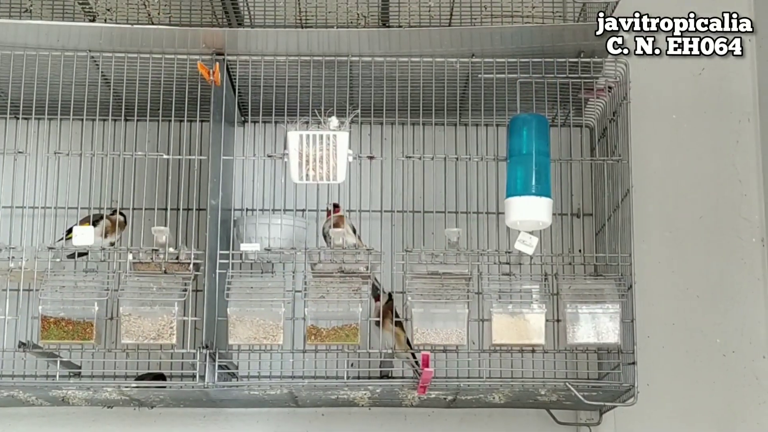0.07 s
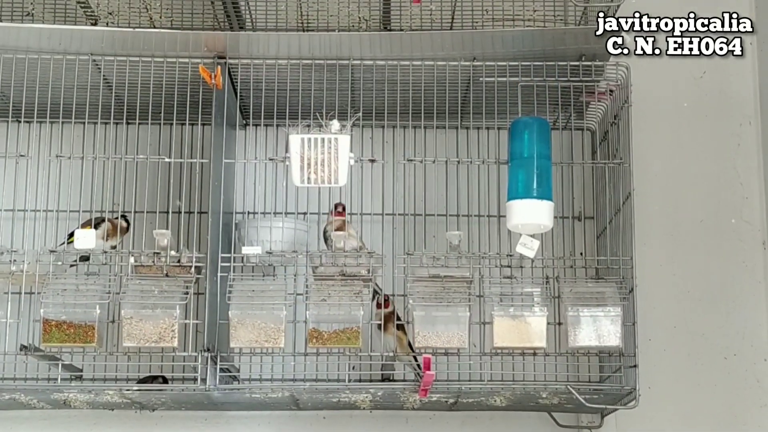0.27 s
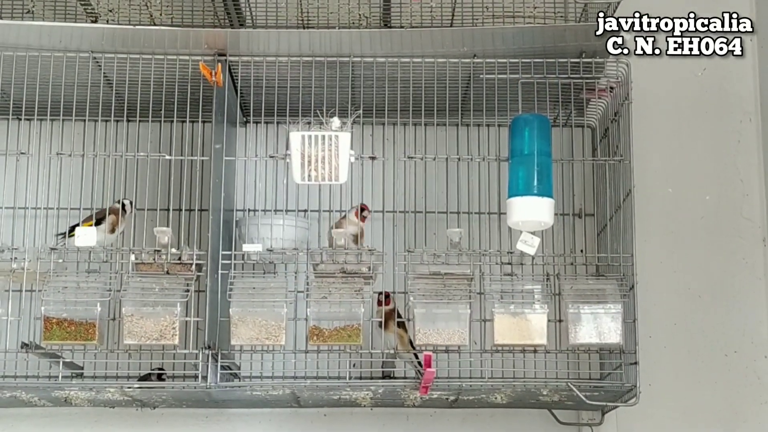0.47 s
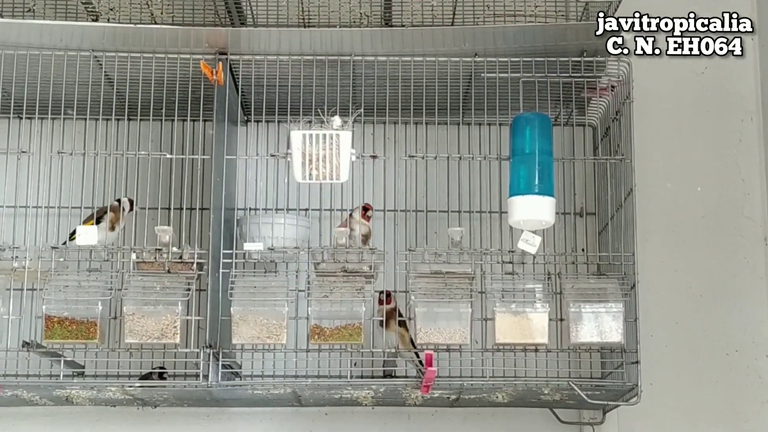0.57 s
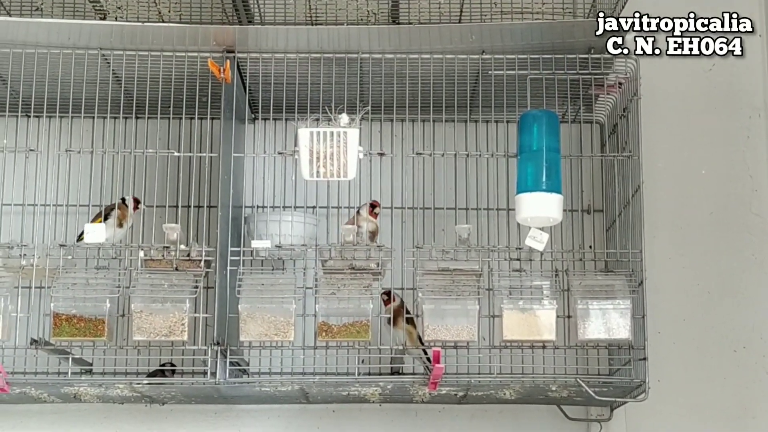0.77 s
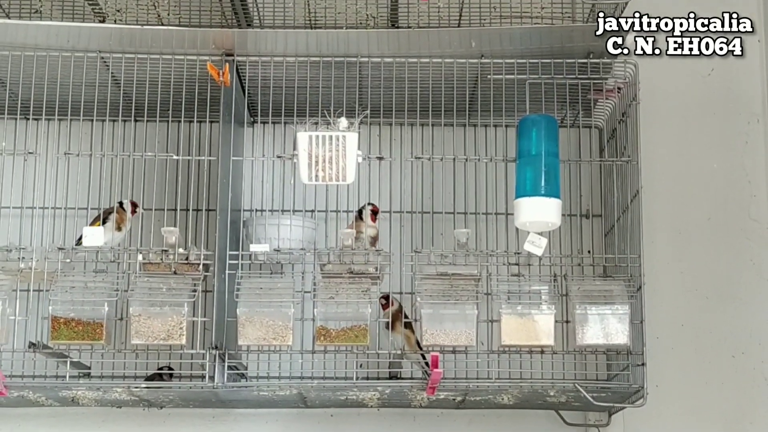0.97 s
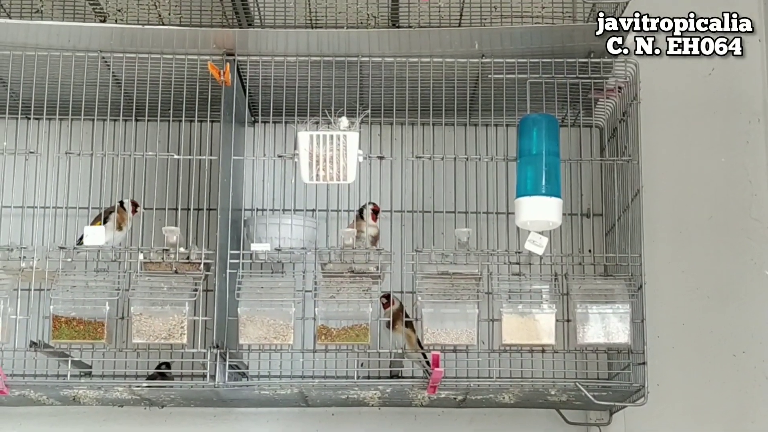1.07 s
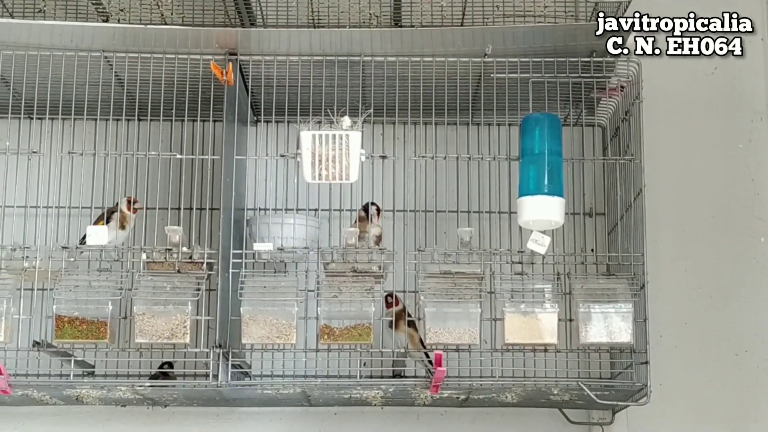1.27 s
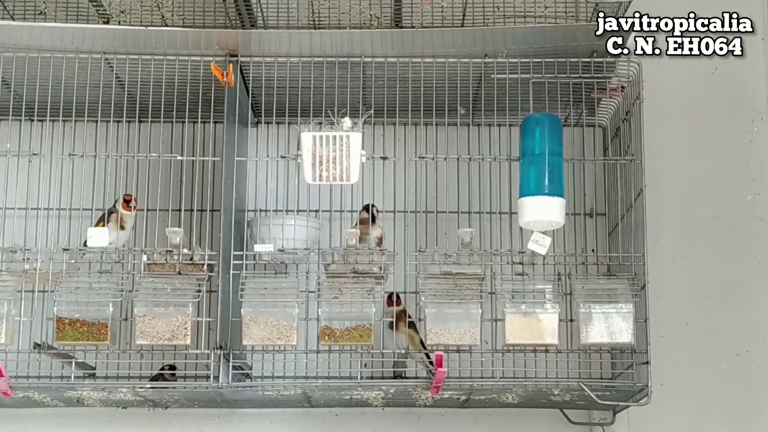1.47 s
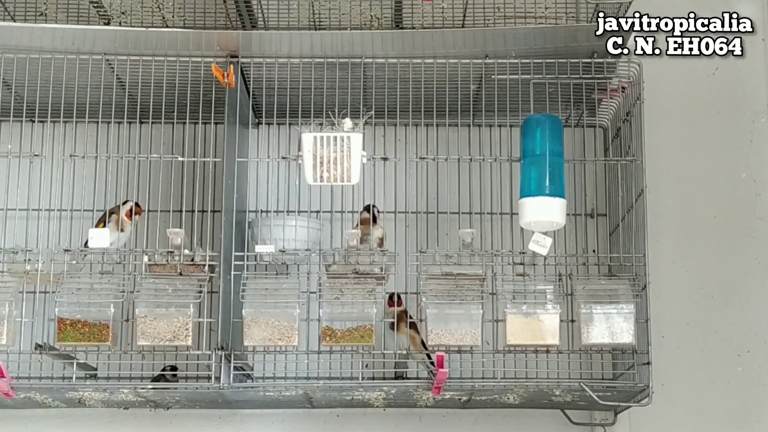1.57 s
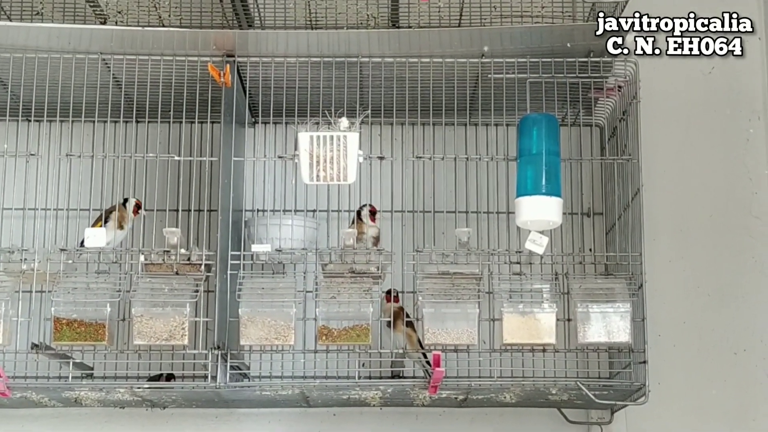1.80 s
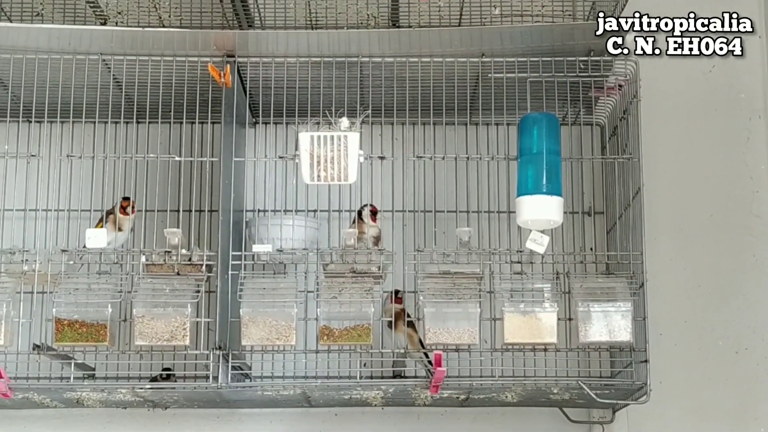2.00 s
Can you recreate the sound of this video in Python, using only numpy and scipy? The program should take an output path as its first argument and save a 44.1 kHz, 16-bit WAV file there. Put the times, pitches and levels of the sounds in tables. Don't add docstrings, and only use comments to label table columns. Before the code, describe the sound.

Caged finches twitter indoors: two sharp two-toned chips at 0.2 and 0.35 s, a whistle sweeping up about an octave from 0.47 to 0.63, then a flap. Claws tick on wire around 0.8-0.96. The loudest cluster of whistles and upward flicks runs 0.93-1.27. Ticks near 1.5, wing flurry at 1.6-1.75 with distant short chirps, fading to a faint peep at 2.0, over soft fan hum, hiss and low rumble.

```python
import sys
import numpy as np
from scipy import signal
from scipy.fft import rfft, irfft
from scipy.io import wavfile
from scipy.ndimage import uniform_filter1d

SR = 44100
rng = np.random.default_rng(int(sys.argv[2]) if len(sys.argv) > 2 else 0)


def how_loud(loudness_db):
    steps = np.asarray(loudness_db, float) / 20
    return 10 ** steps


def unload_audio(sound):
    columns = np.transpose(np.atleast_2d(sound))
    steps = np.round(np.clip(columns, -1, 1) * 32767)
    wavfile.write(sys.argv[1], SR, steps.astype(np.int16))


N = 89964
BIN_HZ = np.fft.rfftfreq(N, 1 / SR)
TIME_S = np.arange(N) / SR


def unit_rms(x):
    return x / np.sqrt(np.mean(x ** 2) + 1e-20)


def read(points, hz):
    point_hz, value = np.transpose(points)
    return np.interp(np.log(hz + 1), np.log(point_hz + 1), value)


def add(mix, start_s, sound):
    part = mix[round(start_s * SR):][:len(sound)]
    part += sound[:len(part)]


def drift(rate_hz):
    spectrum = rfft(rng.standard_normal(N))
    return unit_rms(irfft(spectrum * np.exp(-(BIN_HZ / rate_hz) ** 2), N))


def resonant_noise(center_hz, width_hz):
    spectrum = rfft(rng.standard_normal(N))
    return unit_rms(irfft(spectrum / (1 + (2 * (BIN_HZ - center_hz) / width_hz) ** 2), N))


# freq_hz, t60_s
ROOM_T60 = [(2000, 0.38), (4000, 0.38), (7000, 0.31), (12000, 0.2)]


def in_room(x, pan_db, room_db, lag_samples):
    taps = np.zeros((2, 30000))
    at = np.arange(0, 29980, 12) + rng.integers(0, 12, (2, 2499))
    np.put_along_axis(taps, at, rng.choice([-1., 1.], at.shape), 1)
    hz, t, z = signal.stft(taps, SR, nperseg=128)
    decay = how_loud(-60 * t / read(ROOM_T60, hz)[:, None])
    tail = signal.istft(z * decay, SR, nperseg=128)[1]
    first_echo_s = 0.00074
    tail *= np.clip(np.arange(tail.shape[1]) / SR / first_echo_s - .5, 0, 1)
    wet = signal.fftconvolve(x[None], tail / np.linalg.norm(tail[0]), axes=1)[:, :N]
    direct = np.array([x, np.roll(x, round(lag_samples))])
    return (direct + how_loud(room_db) * wet) * how_loud([[pan_db / 2], [-pan_db / 2]])


# freq_hz, level_db_per_hz
AIR_SPECTRUM = [(30, -4.5), (230, -2), (400, -6), (750, -5), (1200, -9.5), (2300, -9), (5000, -22),
                (14500, -22.5)]
# center_hz, width_hz, boost_db
CAPSULE = (8700, 1780, 10.6)
# freq_hz, correlation
LIKENESS = [(60, 0.95), (180, 1), (540, 0.66), (1630, -0.19), (4880, 0.17), (14700, -0.26)]


def air():
    frames, hz = N // 256 + 5, np.fft.rfftfreq(1024, 1 / SR)
    a, b, c, d, patches = rng.standard_normal((frames, 513, 5)).T
    patches = uniform_filter1d(patches, 30, 0)
    patches = unit_rms(uniform_filter1d(patches, 14, 1))
    same = np.clip(read(LIKENESS, hz), -1, 1)[:, None]
    left = a + 1j * b
    right = same * left + np.sqrt(1 - same ** 2) * (c + 1j * d)
    center_hz, width_hz, boost_db = CAPSULE
    capsule_db = boost_db * np.exp(-((hz - center_hz) / width_hz) ** 2)
    level_db = (read(AIR_SPECTRUM, hz) + capsule_db)[:, None] + 0.8 * patches
    noise = signal.istft(np.array([left, right]) * how_loud(level_db), nperseg=1024, noverlap=768)[1]
    return how_loud(-39.5) * unit_rms(noise[:, :N])


# freq_hz, level_db
HUM = [
    (118.4, -52),
    (220.7, -56),
    (268.5, -53.5),
    (538.3, -55),
    (597.5, -59),
    (629.8, -65),
    (716.0, -59),
]


def fan_hum():
    hum = np.zeros(N)
    for hz, db in HUM:
        level = how_loud(db + 0.5 * drift(5.3))
        cycles = hz * TIME_S + 0.0078 * drift(14) + rng.random()
        hum += level * np.sqrt(2) * np.sin(2 * np.pi * cycles)
    return hum


# time_s, level_db
RUMBLE = [
    (0.0, -38.5),
    (0.229, -38.5),
    (0.61, -45),
    (0.99, -53.5),
    (1.06, -49),
    (2.001, -43.5),
    (2.04, -54),
]


def rumble():
    time_s, level_db = np.transpose(RUMBLE)
    shake = resonant_noise(44.9, 21.4) + how_loud(-18) * resonant_noise(19.0, 22)
    return how_loud(np.interp(TIME_S, time_s, level_db)) * shake


# start_s, length_s, level_db, dullness_db
BEATS = [
    (0.086, 0.063, -47.5, -30),
    (0.63, 0.041, -34.5, -1),
    (1.585, 0.044, -40.5, 7.5),
    (1.649, 0.045, -27.5, -3.5),
    (1.711, 0.044, -45, 11),
    (2.025, 0.037, -40, 15),
]
# freq_hz, level_db_per_hz
FEATHER = [(710, -56), (1200, -23), (2410, -13), (2650, -17.5), (3840, -8), (5500, -9), (8300, 1),
           (11500, -11), (14500, -23)]


def wings():
    snaps_per_s, snap_db = 3000, 3
    hiss = rng.standard_normal(N)
    snap_level = how_loud(snap_db * rng.exponential(1, N))
    snapping = rng.random(N) < snaps_per_s / SR
    snaps = rfft(hiss * (0.88 + snap_level * snapping)) * how_loud(read(FEATHER, BIN_HZ))
    bright = irfft(snaps, N)
    dull = irfft(snaps / (1 + (BIN_HZ / 5800) ** 8), N) / bright.std()
    out = np.zeros(N)
    for start_s, length_s, level_db, dull_db in BEATS:
        stroke = np.sin(np.pi * np.clip((TIME_S - start_s) / length_s, 0, 1) ** 1.17) ** 2
        out += stroke * how_loud(level_db) * (unit_rms(bright) + (how_loud(dull_db) * 2 - 1) * dull)
    return in_room(out, pan_db=-1, room_db=5, lag_samples=5)


# time_s, peak_db, ring_hz
TICKS = [
    (0.8062, -30, 7900),
    (0.884, -24, 8620),
    (0.8913, -42, 8470),
    (0.9618, -25, 8460),
    (0.9804, -46, 8500),
    (1.501, -30.5, 8100),
    (1.571, -23.5, 8880),
]


def claws():
    t60_s, attack_s = 0.0079, 0.00053
    out, t = np.zeros(N), np.arange(600) / SR
    for time_s, peak_db, hz in TICKS:
        ring = np.sin(2 * np.pi * hz * t)
        ring += .5 * np.sin(2 * np.pi * hz * 0.95 * t)
        ring += 0.44 * np.sin(2 * np.pi * hz * .84 * t)
        add(out, time_s, np.minimum(t / attack_s, 1) * how_loud(peak_db - 60 * t / t60_s) * ring / 1.54)
    return in_room(out, pan_db=.6, room_db=6, lag_samples=5)


def breath_haze(breath_db):
    return how_loud(breath_db) * resonant_noise(7950, 8900)


def whistle(hz, level, second_db, third_db, breath):
    phase = 2 * np.pi * np.cumsum(hz) / SR
    tone = np.sin(phase)
    for k, db in ((2, second_db), (3, third_db)):
        tone = tone + how_loud(db) / (1 + (k * hz / 12200) ** 12) * np.sin(k * phase)
    return level * (np.sqrt(2) * tone + breath)


def notes(rows, second_db, third_db, bend, swell_db, tremble, breath_db, pan_db, room_db, lag_samples):
    attack_s, release_s, shimmer_db = .007, .008, 2.5
    out, wobble, shimmer = np.zeros(N), drift(300), drift(200)
    breath = breath_haze(breath_db)
    for start_s, length_s, from_hz, to_hz, level_db in rows:
        t = np.arange(0, length_s, 1 / SR)
        i = np.minimum(np.arange(len(t)) + round(start_s * SR), N - 1)
        hz = from_hz + (to_hz - from_hz) * (t / length_s) ** bend
        hz = hz * (1 + tremble * wobble[i])
        shape = np.clip(np.minimum(t / attack_s, (length_s - t) / release_s), 0, 1)
        shape = shape * how_loud(swell_db * (t / length_s - 1))
        level = shape * how_loud(level_db + shimmer_db * shimmer[i])
        add(out, start_s, whistle(hz, level, second_db, third_db, breath[i]))
    return in_room(out, pan_db, room_db, lag_samples)


DISTANT = [
    (1.612, 0.024, 3287, 3680, -33.5),
    (1.678, 0.015, 3560, 4000, -32),
    (1.732, 0.023, 3507, 3640, -33.5),
    (1.79, 0.02, 3640, 3680, -51),
    (1.83, 0.029, 3610, 3660, -51),
    (1.91, 0.035, 3540, 3660, -48.5),
    (1.96, 0.023, 3600, 3640, -56),
    (1.995, 0.02, 8260, 8440, -42),
]
DISTANT_VOICE = (-16, -25, .6, 1.5, .008, -16, 2, 2.5, 1)


def distant_bird():
    return notes(DISTANT, *DISTANT_VOICE)


STRANDS = [(.197, .035, 13400, 12500, -40.5), (0.18, 0.034, 8000, 10000, -41),
           (.345, 0.043, 11300, 12000, -48.5), (.472, 0.029, 5950, 6800, -30), (.494, .02, 6300, 8800, -37),
           (0.41, 0.038, 12700, 12600, -44.5), (.575, 0.056, 9500, 11250, -40.5),
           (.545, 0.026, 11800, 13700, -44), (.65, 0.025, 11800, 12000, -45.5),
           (0.94, .03, 8700, 9000, -35), (1.1, 0.028, 8600, 10300, -36), (1.9, .05, 6700, 7200, -54),
           (.69, 0.0294, 6300, 6000, -34.5)]
STRAND_VOICE = (-40, -60, .7, 3, .015, -14, -1, 2.5, -7)


def strands():
    return notes(STRANDS, *STRAND_VOICE)


NASAL = [
    (.463, 0.0488, 2793, 3194, -46.5),
]
NASAL_VOICE = (5, 11, .3, -3, .011, -8, 1.6, 4, 1)


def nasal_note():
    return notes(NASAL, *NASAL_VOICE)


LEAD = [
    (.4, 0.074, 1870, 2528, -45),
]
LEAD_VOICE = (2, -8, 1.2, 3, .022, -14, 0, 5, 2)


def lead_in():
    return notes(LEAD, *LEAD_VOICE)


HELD = [
    (1.02, 0.0646, 4260, 4500, -24.5),
    (1.062, 0.021, 7810, 7950, -29.5),
    (1.155, 0.028, 3990, 4150, -19.5),
    (1.14, 0.049, 7000, 7850, -30),
    (1.13, .032, 11350, 11600, -45),
    (1.235, 0.031, 5200, 4650, -26),
    (0.93, 0.029, 9900, 10400, -33.5),
]
HELD_VOICE = (-14, -40, .4, 12, .008, -15, 0, -1, -6)


def held_whistles():
    return notes(HELD, *HELD_VOICE)


FLICKS = [
    (.652, 0.026, 5890, 6890, -26.5),
    (.53, 0.041, 8140, 9780, -29.5),
    (1.064, 0.02, 4670, 5420, -29),
    (1.082, 0.027, 4730, 6940, -27),
    (1.224, 0.031, 4550, 5345, -30),
    (1.243, 0.026, 4646, 7180, -29.5),
]
FLICK_VOICE = (-18, -35, .9, 3, .011, -14, -1.5, 3, -7)


def flicks():
    return notes(FLICKS, *FLICK_VOICE)


CHIPS = [
    (.188, 0.048, 6960, 7730, -25),
    (.192, 0.0447, 6120, 5470, -24.5),
    (.205, .045, 4750, 3746, -37),
    (.224, 0.032, 7700, 8740, -34),
    (.337, 0.036, 6696, 7310, -24.5),
    (.346, 0.042, 6050, 5255, -25.5),
]
CHIP_VOICE = (-16, -50, .55, 8, .022, -21, .8, 3, -7)


def chips():
    return notes(CHIPS, *CHIP_VOICE)


def long_note(curve, second_db, third_db, tremble, breath_db, pan_db, room_db, lag_samples):
    time_s, pitch_hz, level_db = np.transpose(curve)
    hz = np.interp(TIME_S, time_s, pitch_hz) * (1 + tremble * drift(250))
    level = how_loud(np.interp(TIME_S, time_s, level_db, -150, -150) + 2.5 * drift(295))
    sound = whistle(hz, level, second_db, third_db, breath_haze(breath_db))
    return in_room(sound, pan_db, room_db, lag_samples)


BURR = [
    (1.066, 3400, -46),
    (1.085, 3435, -28),
    (1.103, 3426, -21.5),
    (1.12, 3620, -25),
    (1.14, 3680, -23.5),
    (1.17, 3876, -26.5),
    (1.19, 3795, -47),
    (1.21, 3730, -50),
    (1.225, 3600, -60),
]
BURR_VOICE = (-22, -35, .006, -18, 0, .5, 1)


def slow_climb():
    return long_note(BURR, *BURR_VOICE)


RISE = [
    (.468, 2846, -45),
    (.485, 3182, -36),
    (.514, 3700, -27.5),
    (.521, 3860, -19),
    (.528, 3980, -33.5),
    (.57, 4714, -27.5),
    (.606, 5330, -38.5),
    (.616, 5555, -19),
    (.628, 5670, -47),
]
RISE_VOICE = (-22, -30, .009, -18, 0, .8, 1)


def long_rise():
    return long_note(RISE, *RISE_VOICE)


# freq_hz, left_minus_right_db
PORTS = [(2500, 1.5), (3500, 1.7), (4500, -2.5), (7000, -3), (8800, 5.5), (13000, 3.5)]


def birds():
    calls = chips() + nasal_note() + lead_in() + flicks() + held_whistles() + distant_bird() + strands()
    calls = calls + long_rise() + slow_climb()
    shade_db = read(PORTS, BIN_HZ) / 2
    return irfft(rfft(calls) * how_loud([shade_db, -shade_db]), N)


def scene():
    return birds() + wings() + claws() + air() + fan_hum() + rumble()


def masked(x):
    mask_db, slope_db_per_band, faint_db, waver_db = 16, 1.5, 5.5, 2.5
    z = signal.stft(x, nperseg=2048, noverlap=1024)[2]
    power = (abs(z[:, :1024]) ** 2).mean(0).reshape(64, 16, -1).mean(1)
    level_db = 10 * np.log10(uniform_filter1d(power, size=2, axis=1) + 1e-20)
    band = np.arange(64)
    above = band[:, None] - band
    reach = np.maximum(above, -4 * above)
    hidden_db = (level_db[None] - slope_db_per_band * reach[:, :, None]).max(1) - mask_db
    usual_db = np.percentile(level_db, 30, axis=1)[:, None] - faint_db + (band[:, None] > 39) * 6
    waver = unit_rms(uniform_filter1d(rng.standard_normal(level_db.shape), size=3, axis=1))
    keep = level_db + waver_db * waver > np.maximum(hidden_db, usual_db)
    keep = keep | (band[:, None] < 4)
    z[:, :1024] *= np.maximum(np.repeat(keep, 16, 0), .006)
    return signal.istft(z, nperseg=2048, noverlap=1024)[1][:, :N]


def band_limit(x):
    return signal.sosfilt(signal.butter(12, 15260, fs=SR, output="sos"), x)


def record(dry):
    lowpass = signal.firwin(801, 14700, window=("kaiser", 9), fs=SR)
    mix = signal.oaconvolve(masked(dry), lowpass[None], "same") + 0.0005
    return band_limit(mix)


dry = scene()
out = record(dry)
unload_audio(out)
```